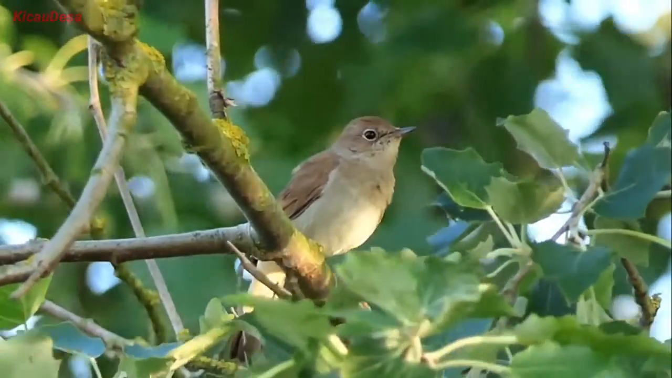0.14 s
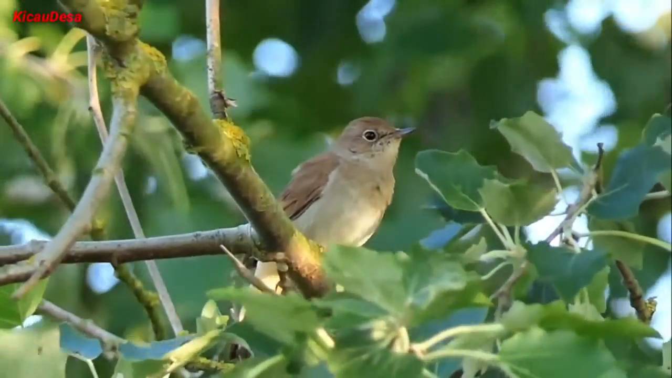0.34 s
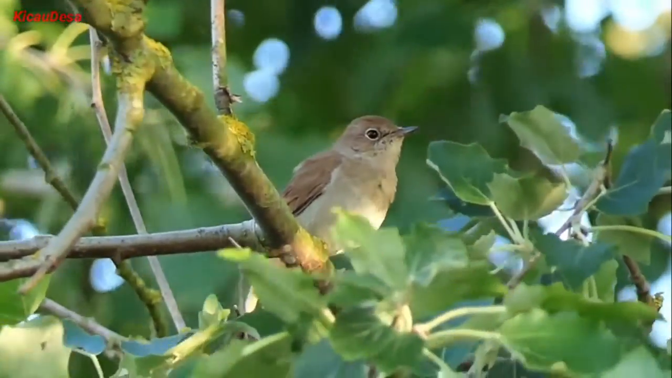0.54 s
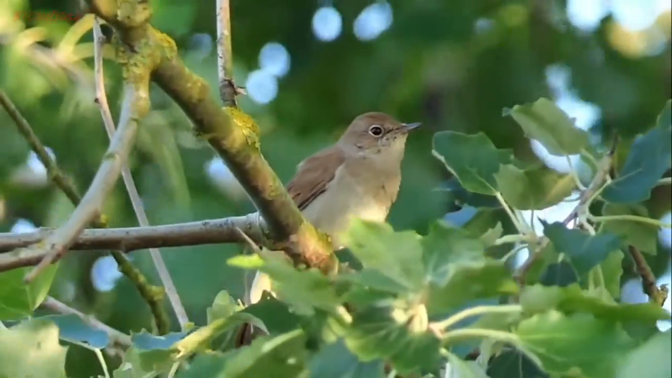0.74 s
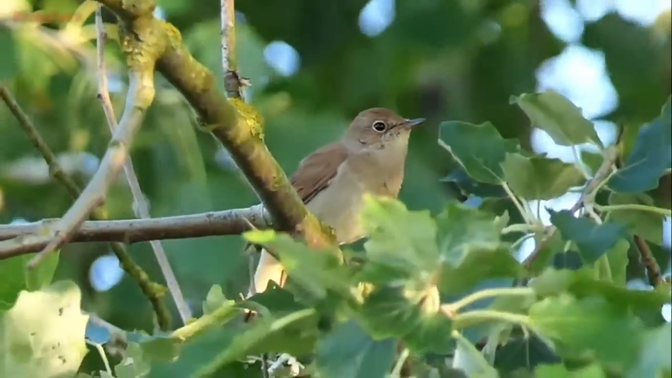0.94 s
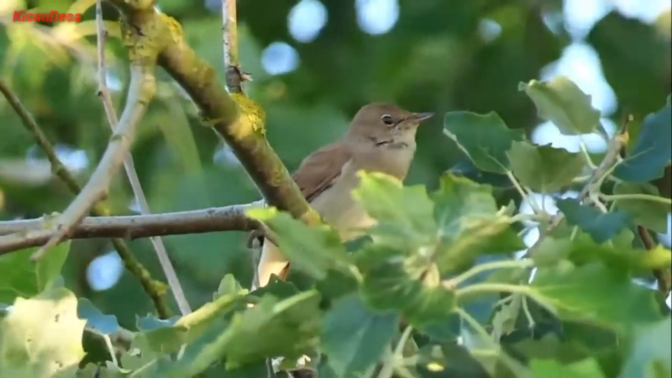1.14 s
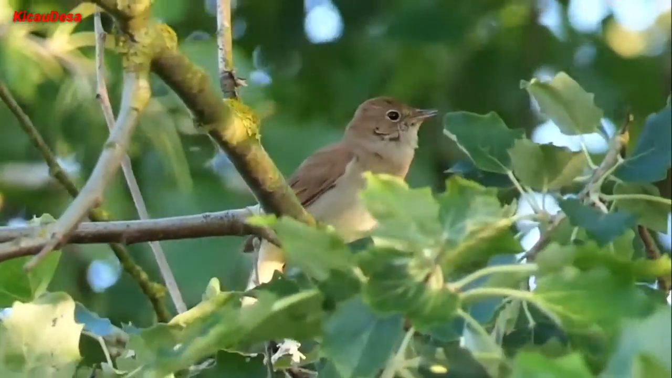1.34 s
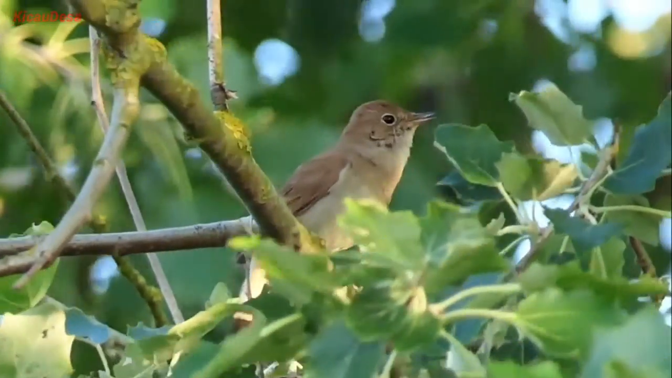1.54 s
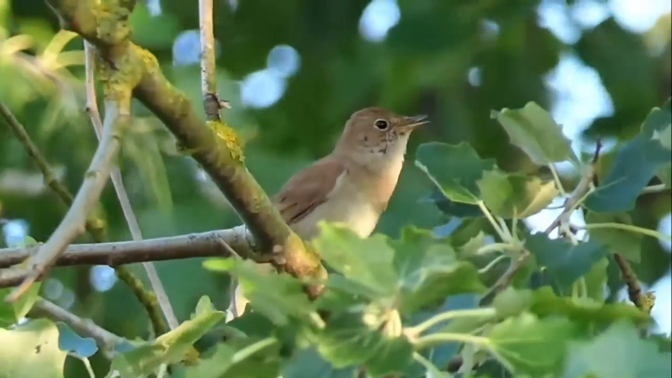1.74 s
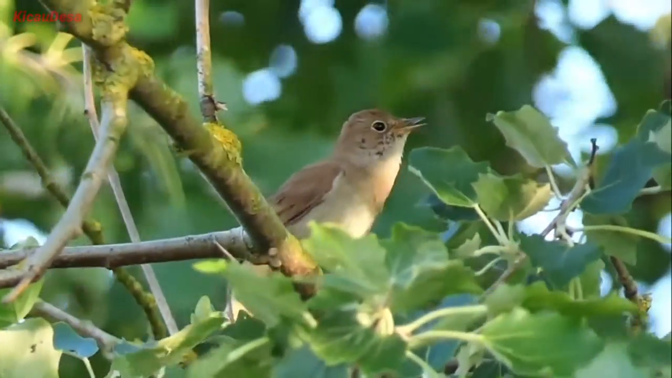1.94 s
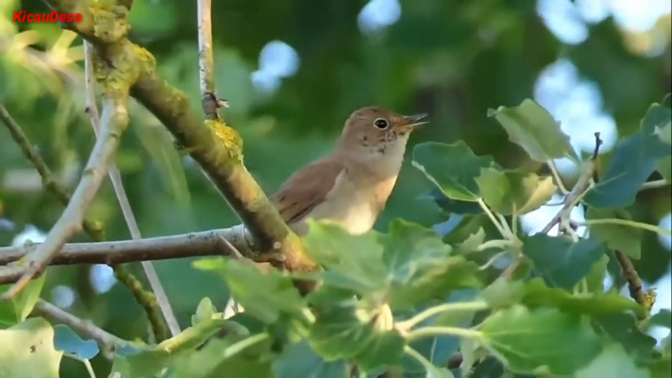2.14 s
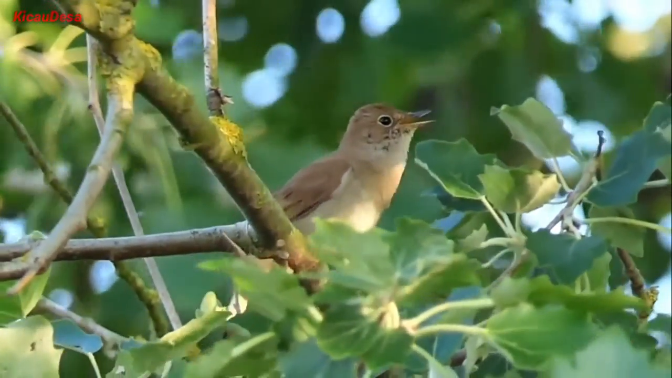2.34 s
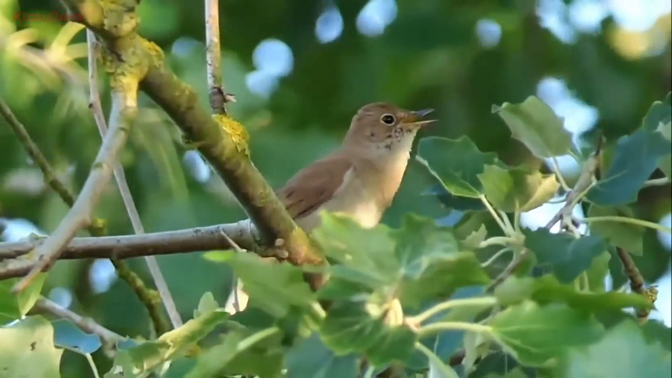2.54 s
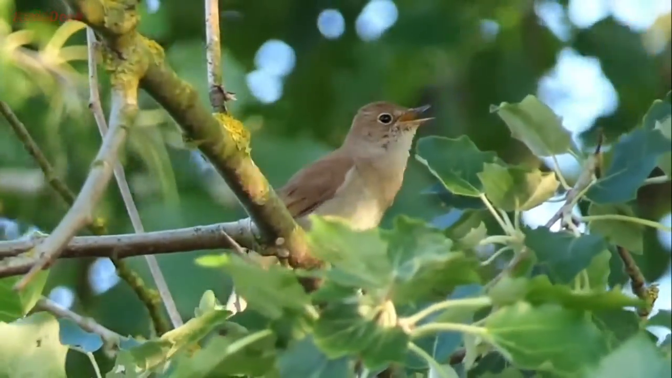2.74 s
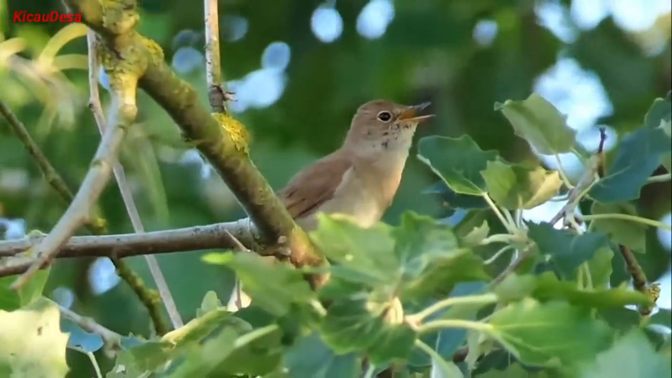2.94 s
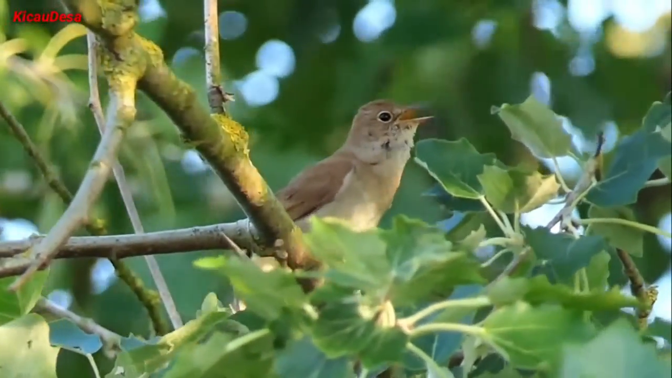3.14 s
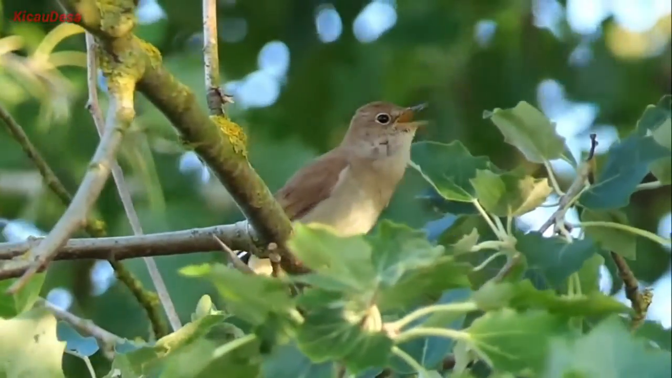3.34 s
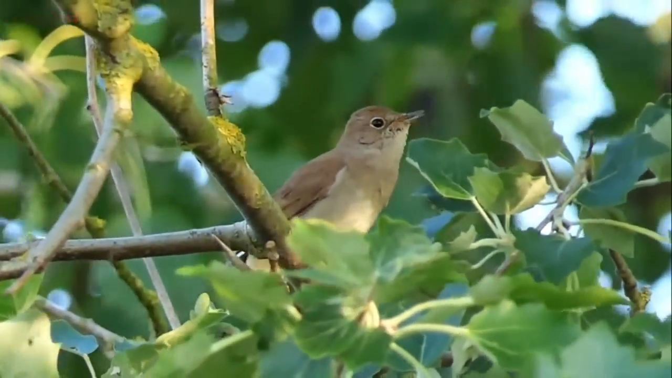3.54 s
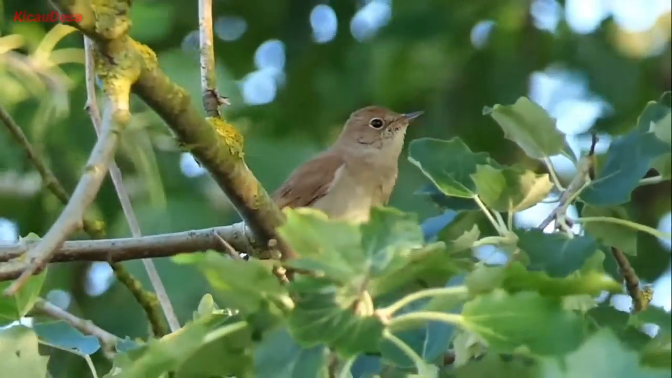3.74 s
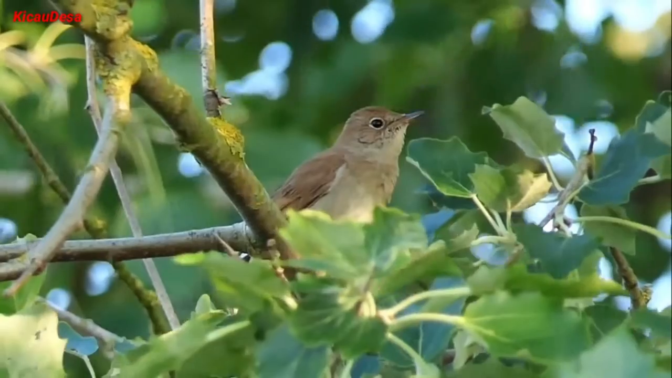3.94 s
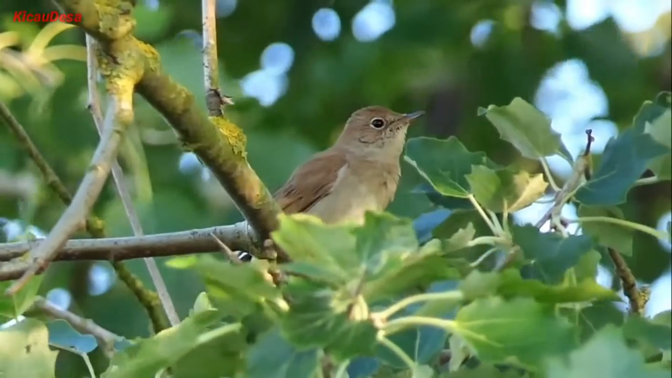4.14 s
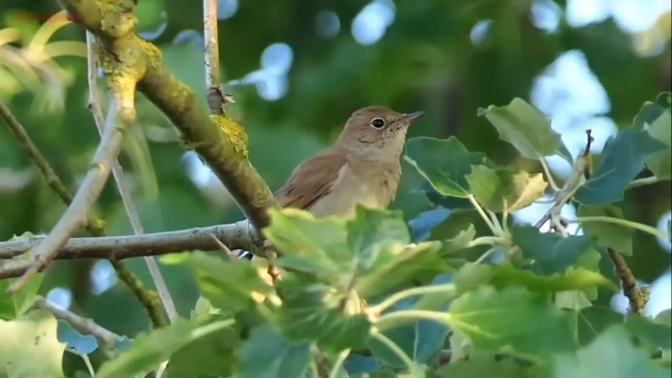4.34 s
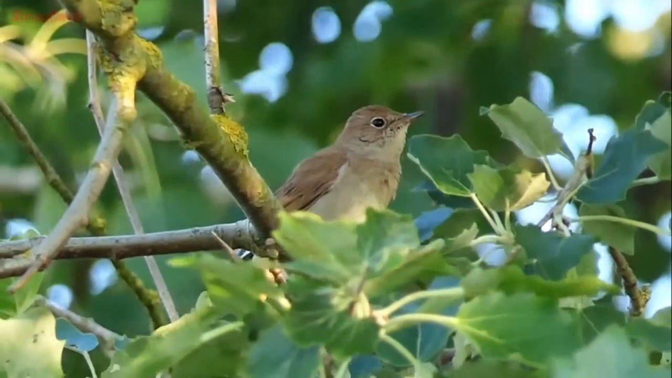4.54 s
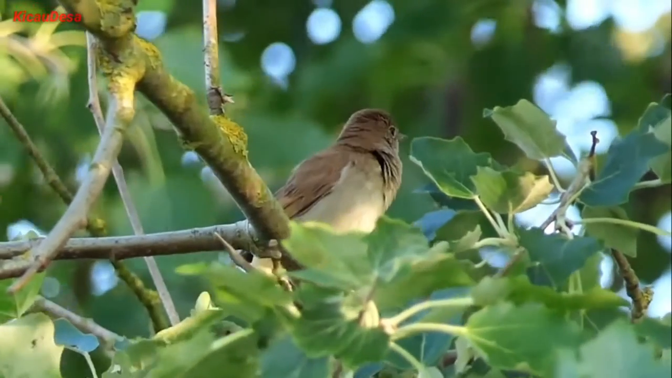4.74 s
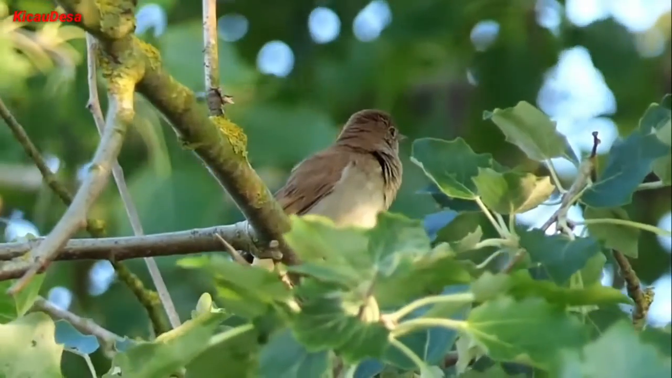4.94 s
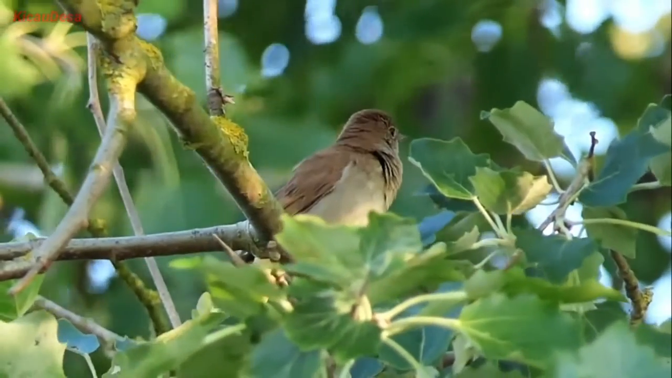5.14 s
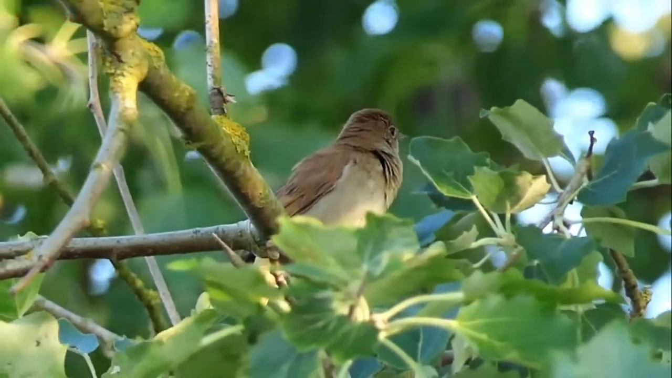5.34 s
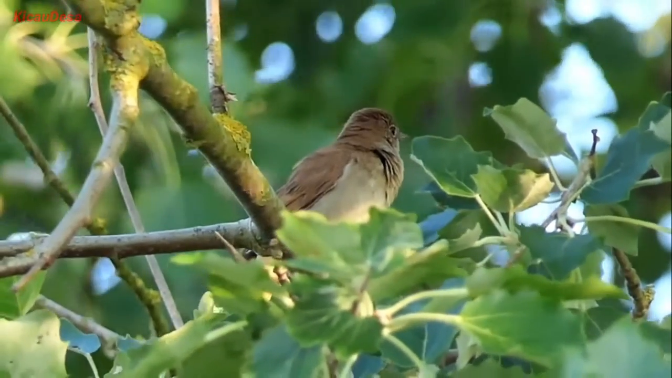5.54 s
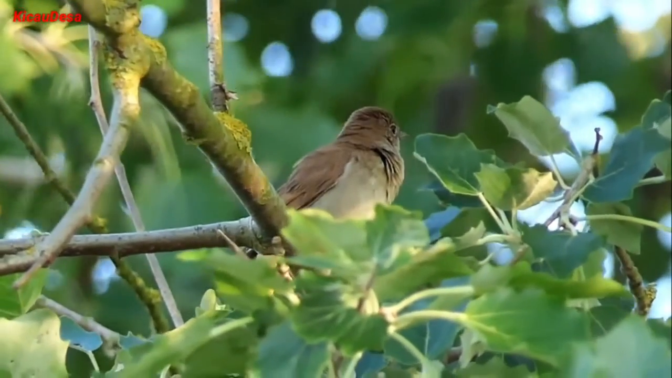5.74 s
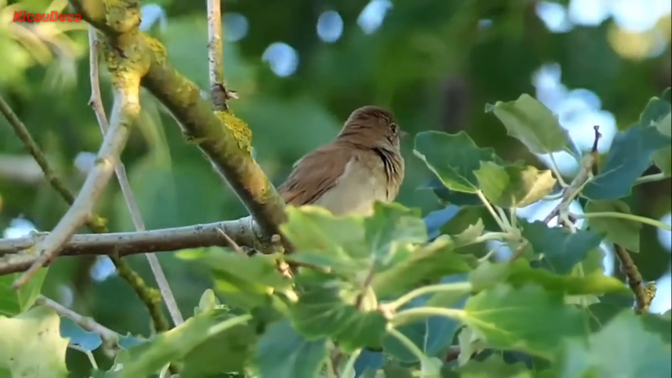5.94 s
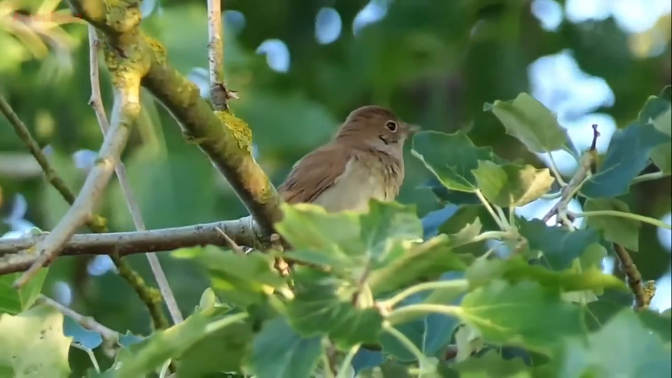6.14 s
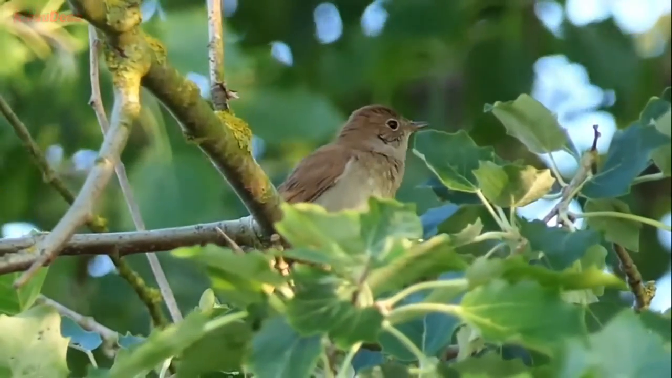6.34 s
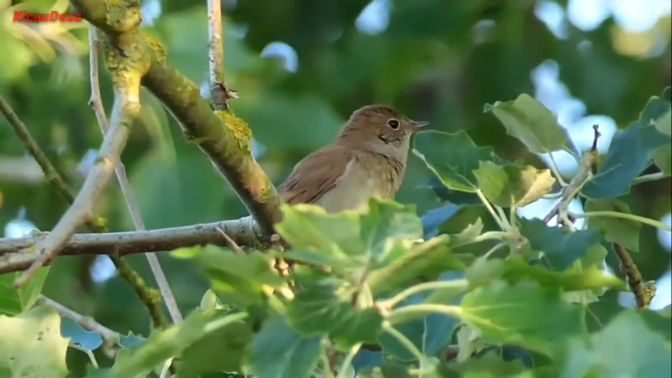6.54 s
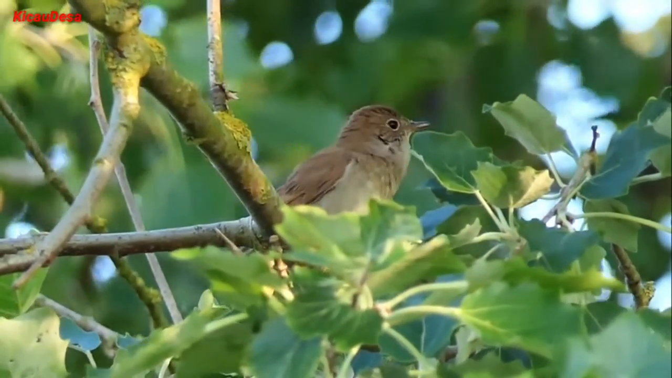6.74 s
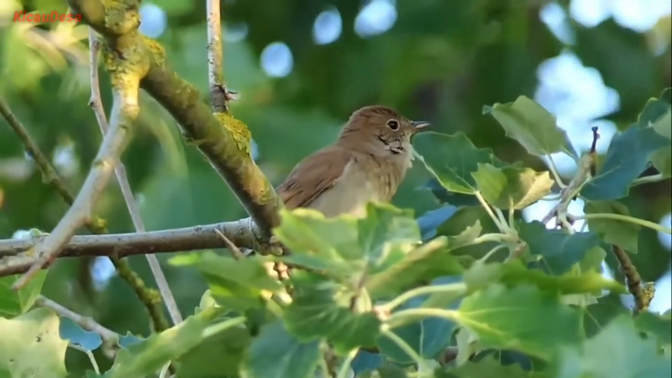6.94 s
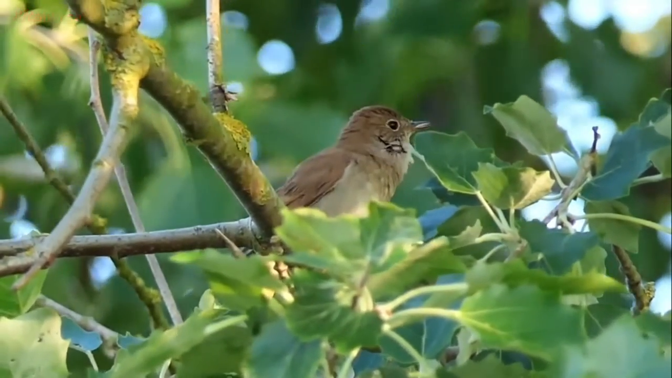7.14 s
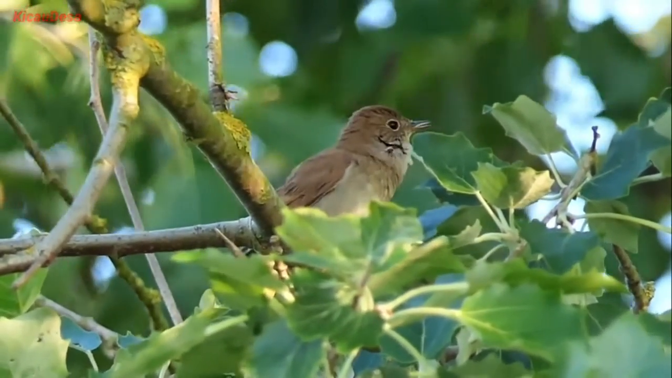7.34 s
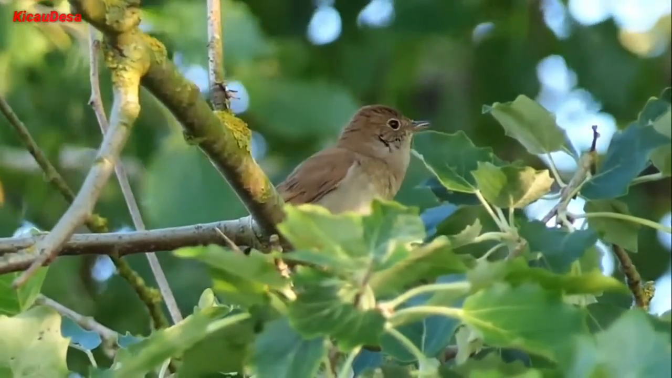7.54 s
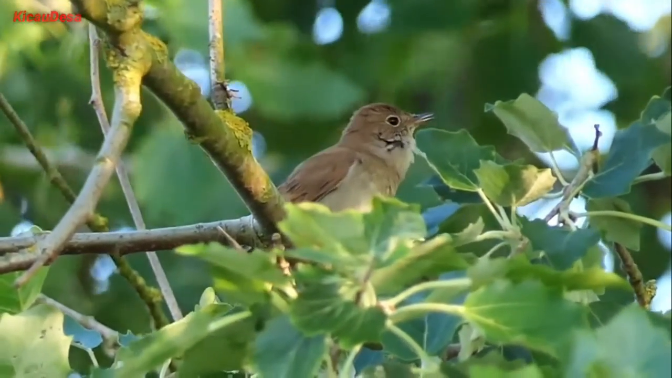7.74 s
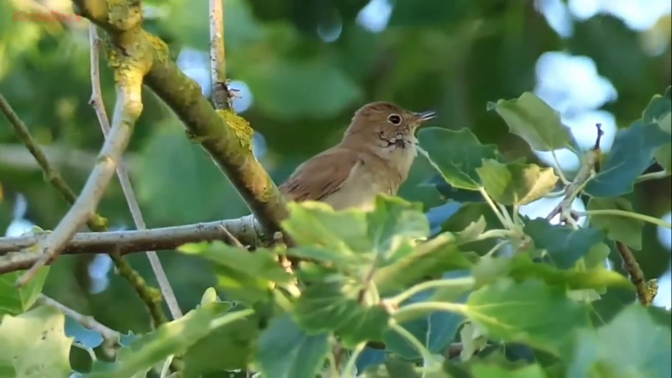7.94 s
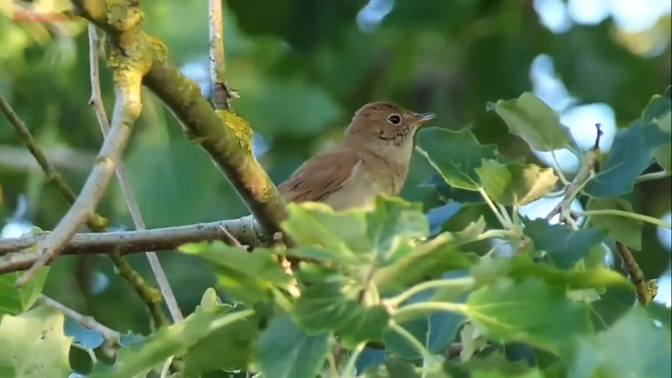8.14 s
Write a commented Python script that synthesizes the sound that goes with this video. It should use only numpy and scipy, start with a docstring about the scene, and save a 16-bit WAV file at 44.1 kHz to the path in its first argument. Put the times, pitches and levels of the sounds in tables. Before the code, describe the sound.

Quiet outdoor air, a faint hush with low rumble, runs throughout. From 0 to 0.65 s a nightingale gives four thin, high, slightly sagging whistles, while a distant bird chips faintly and another ticks dryly now and then. Two tiny clucks come near 1.05 s. From 1.27 to 3.35 s eleven round fluted notes repeat about five per second, swelling from soft to very loud, with buzzy edges on the last three. At 3.42 to 3.7 s a sharp flourish bursts out: bright swoop, short scoop, rasping upward zip, with a brief scatter of leafy echo. The singer then pauses; from 3.7 s farther birds give thin whistle runs, and from about 4.6 s warbles, chirps and faint twitter. Soft wet clucks fall at 6.4, 6.6, 6.9 and 7.7 s. Two low, quavering whistles, gently rising, sound at 7.1-7.6 and 7.85-8.3 s, the second louder, ending the scene.

```python
"""Nightingale in a poplar

A nightingale sings four thin whistles, a crescendo of eleven fluted notes and a loud three-part flourish,
clucks softly and starts two low, drawn-out whistles: syrinx tones on pitch curves, with noise where they rasp.
Other small birds warble, chirp and tick farther off, as bent tones and short bursts of noise.
Decaying noise echoes scatter every note in the foliage, over a faint outdoor hush and a low rumble of air."""
import sys
import numpy as np
from scipy import signal
from scipy.fft import rfft, irfft, next_fast_len
from scipy.io import wavfile
from scipy.ndimage import map_coordinates

SR = 44100
rng = np.random.default_rng(int(sys.argv[2]) if len(sys.argv) > 2 else 0)


def store_wav(level_fs):
    """Save 16-bit WAV to argv[1]."""
    pcm = np.round(np.clip(np.atleast_2d(level_fs), -1, 1) * 32767)
    wavfile.write(sys.argv[1], SR, pcm.T.astype(np.int16))


N = 365148
TOP_HZ = 15500  # upper band limit

# falling syllable, drops fast then eases: (share of length [0-1], share of pitch [0-1])
FALL_CONTOUR = [(0, 0.96), (.5, .81), (1, .69)]


def amp(db):
    """Decibels to gain."""
    return 10 ** (np.asarray(db) / 20)


def unit(x):
    """Scale to rms 1."""
    return x / np.sqrt(np.mean(x ** 2) + 1e-20)


def along(points, hz):
    """Read (Hz, value) points on a log frequency axis."""
    f, v = np.transpose(points)
    return np.interp(np.log(hz + 1), np.log(f + 1), v)


def filtered(x, response):
    """x with its spectrum multiplied by response(Hz)."""
    n = x.shape[-1]
    m = next_fast_len(n + 8192)
    gain = response(np.fft.rfftfreq(m, 1 / SR))
    return irfft(rfft(x, m) * gain, m)[..., :n]


def noise(spectrum, n):
    """n samples of coloured noise of rms 1."""
    white = rng.standard_normal(n)
    return unit(filtered(white, lambda hz: amp(along(spectrum, hz))))


def wobble(rate, n):
    """A smooth random curve, rate knots a second."""
    knots = rng.standard_normal(int(n * rate / SR) + 4)
    return map_coordinates(knots, [np.arange(n) * rate / SR])


def clock(length):
    """Sample times [s] of a note."""
    return np.arange(int(length * SR)) / SR


def ramp(x):
    """A smooth step from 0 to 1."""
    return np.sin(np.clip(x, 0, 1) * np.pi / 2) ** 2


def add(track, s, note):
    """Mix a note into a track at time s [s], cut to the track."""
    i = round(s * SR)
    note = note[max(-i, 0):max(N - i, 0)]
    track[max(i, 0):max(i, 0) + len(note)] += note


def stereo(mid, side, width):
    """Two close microphones hear almost the same: a shared mid and a weak side of opposite sign."""
    side = filtered(side, lambda hz: amp(along(width, hz)))
    return np.array([mid + side, mid - side])


def among_leaves(x, near_db, far_db, bright_db):
    """Near leaves scatter a quick cluster of echoes, the trees a longer tail; bright_db shapes their treble."""
    # tail decay: (frequency [Hz], t60 [s])
    tail_t60 = [(500, 0.23), (2000, 0.42), (6000, 0.37), (9000, 0.43), (15000, 0.24)]
    # reflection of the leaves: (frequency [Hz], share of bright_db [ratio])
    leaf_share = [(2000, 0.051), (4000, 1.27), (7000, 1.4), (10500, 0.063), (12700, 0.63), (15000, .9)]
    # width of the echoes: (frequency [Hz], side gain [dB])
    echo_width = [(2000, -58.5), (5000, -19.5), (8000, -22.5), (13000, -9.5)]
    hz, t, z = signal.stft(rng.standard_normal((2, SR // 2)), SR, nperseg=256)
    decay = amp(-60 * t / along(tail_t60, hz)[:, None])
    far = signal.istft(z * decay, SR, nperseg=256)[1]
    t = np.arange(far.shape[1]) / SR
    near = rng.standard_normal(far.shape) * amp(-60 * t / 0.14)
    near = near * ramp(t / 0.0037)
    far = far * ramp(t / 0.01)
    echo = sum(amp(db) * e / np.linalg.norm(e[0]) for db, e in [(near_db, near), (far_db, far)])
    wet = signal.fftconvolve(x[None], echo, axes=1)[:, :N]
    mid, side = filtered(wet, lambda f: amp(bright_db * along(leaf_share, f)))
    return x + stereo(mid, side, echo_width)


def syrinx(hz, overtones=()):
    """A nearly pure tone on a pitch curve, fundamental of rms 1, with weak overtones (number, dB)."""
    phase = 2 * np.pi * np.cumsum(hz) / SR
    upper = sum(amp(db) * np.sin(k * phase) * (k * hz < SR / 2) for k, db in overtones)
    return np.sqrt(2) * (np.sin(phase) + upper)


def loud_syrinx(hz, blur, edge=1):
    """A strong pure tone; overtones follow the throat's resonances and smear where the flow is turbulent."""
    # throat resonances: (frequency [Hz], overtone strength at edge 1 [dB re fundamental])
    throat = [(3000, -29), (4200, -38), (5500, -48), (7500, -49.5), (9500, -37), (11000, -50),
              (12600, -30.5), (13600, -48), (14500, -36.5), (15500, -46.5)]
    phase, n = 2 * np.pi * np.cumsum(hz) / SR, len(hz)
    overtones = 0
    for k in range(2, 10):
        strength = amp(along(throat, k * hz)) * (k * hz < TOP_HZ)
        smear = blur * np.sqrt(k) * wobble(1000, n)
        overtones = overtones + strength * np.sin(k * phase + smear)
    return np.sqrt(2) * (np.sin(phase) + edge * overtones)


def air(hush_db=-57, rumble_db=-53.5):
    """A near-steady hush of distant leaves and traffic over a slowly heaving rumble."""
    # hush spectrum: (frequency [Hz], relative level [dB])
    hush_colour = [(59, -28.5), (100, -5.5), (209, -2.5), (293, -11), (377, -11), (551, -0.5), (823, 0.5),
                   (2220, -7), (3830, -6.5), (5040, -10.5), (5970, -17), (6770, -13), (9890, -22.5),
                   (14500, -26.5), (15400, -25)]
    # rumble spectrum: (frequency [Hz], relative level [dB])
    rumble_colour = [(4, -2.5), (12, 6.5), (25, -7.5), (38, -4), (50, -1.5), (62, -9.5), (80, -24.5),
                     (120, -29.5), (300, -69)]
    # width of the air: (frequency [Hz], side gain [dB])
    air_width = [(25, -25), (90, -14.5), (300, -13.5), (700, -22), (2000, -19.5), (8000, -6.5)]
    hush = stereo(noise(hush_colour, N), noise(hush_colour, N), air_width)
    rumble = stereo(noise(rumble_colour, N), noise(rumble_colour, N), air_width)
    hush = amp(hush_db + 0.69 * wobble(20.0, N)) * hush
    rumble = amp(rumble_db + 0.83 * wobble(1.8, N)) * rumble
    return hush + rumble


def slur(length, start_hz, middle_hz, end_hz, jitter):
    """A note that bends along an arc through three pitches, loudest in its middle."""
    u = clock(length) / length
    arc_hz = 2 * u * (1 - u) * (2 * middle_hz - start_hz - end_hz)
    hz = start_hz + (end_hz - start_hz) * u + arc_hz
    return np.sin(np.pi * u) ** 0.59 * syrinx(hz * (1 + jitter * wobble(400, len(u))))


def twitter(count=150, low_hz=3200, high_hz=8000, bend=0.1235, trim_db=-3):
    """Many faint chirps from deep in the trees, at random times and pitches in the later part."""
    # loudness of the twitter: (time [s], level before trim and scatter [dB])
    loudness = [(4.852, -56), (5.7, -65), (6.5, -63.5), (7.3, -61.5), (7.8, -63.5), (8.28, -59)]
    out = np.zeros(N)
    times, levels = np.transpose(loudness)
    for when, pitch, span, a, b, size in rng.random((count, 6)):
        s = times[0] + (times[-1] - times[0]) * when ** .7  # denser toward the end
        hz = low_hz + (high_hz - low_hz) * pitch
        db = np.interp(s, times, levels) + trim_db + 7 * (size - .5)
        start_hz = hz * (1 + bend * (2 * a - 1))
        end_hz = hz * (1 + bend * (2 * b - 1.4))
        add(out, s, amp(db) * slur(0.0103 + 0.02 * span, start_hz, hz, end_hz, jitter=0.01))
    return out


def ticks(trim_db=-1, t60_s=0.068):
    """A bird's dry tick: a burst of noise that dies at once."""
    # ticking calls: (time [s], level before trim and envelope [dB])
    calls = [(.377, -35), (.825, -38.5), (1.436, -37.5), (1.927, -36), (2.378, -36.5), (2.946, -35.5),
             (3.398, -31.5), (4.076, -35), (5.772, -33.5), (6.134, -37), (6.702, -37.5), (7.305, -40.5),
             (7.941, -38.5)]
    # tick spectrum: (frequency [Hz], relative level [dB])
    colour = [(1000, -23.5), (1800, -8.5), (3500, -3), (5500, 0), (7000, -0.5), (8300, -3), (9500, -27.5),
              (15000, -35.5)]
    out, t = np.zeros(N), clock(.06)
    for s, db in calls:
        level = amp(db + trim_db - 60 * t / t60_s) * ramp(t / 0.0048)
        add(out, s - .002, level * noise(colour, len(t)))
    return out


def syllables(shape, rows, jitter=0.0055, octave_db=-31, flutter_db=1.5):
    """One syllable type, stretched and transposed for each row and loudest in its middle."""
    out = np.zeros(N)
    for s, length, pitch_hz, db in rows:
        u = clock(length) / length
        hz = pitch_hz * np.interp(u, *np.transpose(shape)) * (1 + jitter * wobble(393, len(u)))
        level = amp(db + flutter_db * wobble(140, len(u))) * np.sin(np.pi * u) ** 0.46
        add(out, s, level * syrinx(hz, [(2, octave_db)]))
    return out


def chips(count=11, scatter_s=0.026, scatter_pitch=0.043, scatter_db=1.0):
    """A far bird repeats a faint, ragged falling chip at an uneven pace."""
    from_s, to_s = .08, 1.3
    length_s, pitch_hz, level_db = 0.016, 3200, -54.5  # mean pitch and level
    beats = np.linspace(from_s, to_s, count)
    rows = [(s + scatter_s * a, length_s, pitch_hz * (1 + scatter_pitch * b), level_db + scatter_db * c)
            for s, (a, b, c) in zip(beats, rng.standard_normal((count, 3)))]
    return syllables(FALL_CONTOUR, rows, jitter=0.043)


def warblers():
    """The neighbours string their song together from eight syllable types, each a pitch contour."""
    # contours: (share of length [0-1], share of pitch [ratio])
    # rows: (start [s], length [s], pitch [Hz], level [dB])
    # hooks hold their pitch, then plunge
    hook_contour = [(0, 0.97), (.6, .94), (.8, .85), (1, .63)]
    hooks = [(4.573, 0.055, 6600, -60), (4.754, 0.08, 6470, -54), (4.897, 0.084, 6610, -48),
             (5.361, 0.024, 5190, -42.5), (5.689, 0.027, 5120, -43.5), (6.577, .068, 6680, -49.5)]
    # dips sink to their pitch and climb out again
    dip_contour = [(0, 1.26), (.2, 1.1), (.44, 1), (.66, 1.22), (1, 1.43)]
    dips = [(5.039, .098, 3755, -40.5), (5.203, 0.095, 3610, -41)]
    # flicks dart up to their pitch and back
    flick_contour = [(0, .62), (.4, 1), (.6, 1), (1, 0.78)]
    flicks = [(5.611, 0.018, 4680, -42), (5.964, .018, 4370, -43), (6.149, 0.027, 3980, -47),
              (6.461, .03, 8100, -59), (7.195, 0.039, 8070, -60), (7.986, 0.026, 7990, -52.5)]
    # rises climb and level off
    rise_contour = [(0, .76), (.2, .88), (1, 1)]
    rises = [(5.401, 0.085, 3690, -46.5), (5.734, 0.084, 3574, -43.5), (6.243, 0.067, 2840, -50.5)]
    # upsweeps climb steadily through a wide span
    upsweep_contour = [(0, 0.6), (.5, .8), (1, 1)]
    upsweeps = [(5.478, 0.059, 3286, -53.5), (5.608, 0.061, 3280, -51), (5.741, 0.063, 3230, -52),
                (7.135, .039, 6500, -58.5), (7.618, .026, 6900, -53)]
    # falls, on the shared contour
    falls = [(.47, 0.028, 5320, -54), (0.547, 0.024, 5800, -52), (.799, 0.022, 3170, -54.5),
             (0.919, .022, 3200, -59), (1.121, 0.011, 6660, -48.5), (1.201, 0.017, 6200, -51.5),
             (5.55, 0.067, 3500, -48), (5.871, 0.044, 5400, -56), (5.883, 0.058, 3460, -45.5),
             (6.028, 0.035, 2300, -58.5), (6.063, 0.057, 3452, -48), (6.086, 0.018, 2790, -52),
             (6.393, .066, 6530, -48), (6.715, 0.025, 6200, -53), (7.41, 0.019, 4220, -51.5),
             (7.825, .024, 4500, -58), (7.86, 0.065, 3700, -54.5)]
    # slides sag gently from a high pitch
    slide_contour = [(0, 0.97), (.5, .965), (1, .92)]
    slides = [(2.152, 0.15, 7500, -55), (3.165, .12, 7500, -58), (6.092, .11, 9300, -63.5),
              (7.185, .056, 6800, -56.5)]
    # pipes stay nearly level
    pipe_contour = [(0, 1), (.5, .993), (1, .975)]
    pipes = [(.3, 0.33, 3700, -69.5), (5.226, 0.19, 2730, -61), (7.658, 0.141, 5940, -60),
             (7.865, 0.18, 4810, -57)]
    kinds = [(hook_contour, hooks), (dip_contour, dips), (flick_contour, flicks), (rise_contour, rises),
             (upsweep_contour, upsweeps), (FALL_CONTOUR, falls), (slide_contour, slides), (pipe_contour, pipes)]
    return sum(syllables(shape, rows) for shape, rows in kinds)


def thin_note(length, top_hz, sag_hz_per_s, hook=0.053, jitter=0.0065):
    """A high whistle that hooks up toward its top pitch and sags slowly."""
    t = clock(length)
    sagging_hz = top_hz - sag_hz_per_s * np.maximum(t - .025, 0)
    hz = sagging_hz * (1 - hook * np.exp(-t / .008) + jitter * wobble(200, len(t)))
    swell = ramp(t / .0018) * np.interp(t, [0, .04], [.35, 1]) * ramp((length - t) / 0.041)
    return amp(2.07 * wobble(65.3, len(t))) * swell * syrinx(hz, [(2, -42)])


def thin_runs(count=3):
    """A neighbour answers with runs of the thin whistle at an even pace."""
    # runs: (start [s], period [s], top pitch [Hz], first level [dB], change per note [dB])
    runs = [(1.61, .19, 7105, -53.5, -2.5), (3.704, 0.17, 6940, -52, -1.5), (4.599, 0.22, 6980, -62.5, -2),
            (5.216, .208, 7165, -55, -1), (7.82, .2, 7225, -55.5, 1)]
    duty, sag_hz_per_s = 0.93, 2100  # duty: share of the period that sounds
    out = np.zeros(N)
    for s, period, top_hz, db, change_db in runs:
        for k in range(count):
            note = thin_note(duty * period, top_hz, sag_hz_per_s, hook=0.025)
            add(out, s + k * period, amp(db + k * change_db) * note)
    return out


def stroke(length, start_hz, end_hz, jitter=0.066, burst_db=-4):
    """A ragged sweep with a noise burst, so short it sounds like a wet click; narrow sweeps stay purer."""
    # burst spectrum: (frequency [Hz], relative level [dB])
    colour = [(900, -26), (1600, 6.5), (2500, -4.5), (3700, 7), (4500, -1), (5500, -34), (12000, -35)]
    u = clock(length) / length
    hz = start_hz * (end_hz / start_hz) ** u * (1 + jitter * wobble(1410, len(u)))
    octaves = abs(np.log2(end_hz / start_hz))
    burst = amp(burst_db) * octaves * noise(colour, len(u))
    return np.sin(np.pi * u) * (syrinx(hz) + burst)


def clucks(trim_db=-2.5):
    """Each cluck is a sharp downward stroke, a weaker rebound and a short low after-note."""
    # clucks: (time [s], start pitch [Hz], level before trim [dB],
    #          rebound [dB re first stroke], after-note [dB re first stroke])
    rows = [(1.052, 4230, -42, -8, -15), (1.073, 3100, -43, -4, -15), (6.373, 5120, -38.5, -7, -7),
            (6.608, 5120, -37.5, -2, -4.5), (6.869, 4670, -36, -2.5, -5.5), (7.718, 4210, -34, -14, -21)]
    stroke_s, end_hz, rebound_s = 0.00547, 1894, .0085
    after_gap_s, after_s, after_start_hz, after_end_hz = .043, 0.012, 1894, 1540
    out = np.zeros(N)
    for s, start_hz, db, rebound_db, after_db in rows:
        add(out, s, amp(db) * stroke(stroke_s, start_hz, end_hz))
        add(out, s + rebound_s, amp(db + rebound_db) * stroke(stroke_s, start_hz, end_hz))
        add(out, s + after_gap_s, amp(db + after_db) * stroke(after_s, after_start_hz, after_end_hz))
    return amp(trim_db) * out


def low_whistles(quaver=.005):
    """Two soft, slightly quavering syrinx whistles open the next phrase."""
    # one curve a whistle: (time [s], pitch [Hz], level [dB])
    curves = [
        [(7.12, 1238, -69), (7.138, 1222, -54), (7.226, 1216, -54), (7.542, 1303, -49), (7.596, 1290, -52.5),
         (7.635, 1410, -49.5)],
        [(7.85, 1286, -52), (7.862, 1300, -50.5), (7.91, 1310, -49.5), (7.936, 1339, -45), (8.24, 1383, -43),
         (8.28, 1430, -41.5)],
    ]
    out = np.zeros(N)
    for rows in curves:
        s, hz, db = np.transpose(rows)
        t = s[0] + clock(s[-1] - s[0])
        pitch_hz = np.interp(t, s, hz) * (1 + quaver * wobble(96.0, len(t)))
        gate = ramp((t - s[0]) / 0.0075) * ramp((s[-1] - t) / 0.0039)
        tone = syrinx(pitch_hz, [(2, -14.0), (3, -38)])
        add(out, s[0], gate * amp(np.interp(t, s, db)) * tone)
    return out


def thin_whistles():
    """The singer opens with four thin, sagging whistles."""
    # whistles: (start [s], top pitch [Hz], level [dB])
    whistles = [(-.025, 7114, -36.5), (.152, 7110, -35.5), (0.34, 7070, -34.5), (0.518, 7010, -36)]
    out = np.zeros(N)
    for s, top_hz, db in whistles:
        add(out, s, amp(db) * thin_note(0.14, top_hz, sag_hz_per_s=3300))
    return out


def fluted_notes(buzz_hz=350, buzz_depth=0.015, buzz_bend=0.026, jitter=0.0037, droop=0.28,
                 blur=0.44, buzz_blur=1.0, full_db=-19):
    """Notes slide in, swell and, if firm, drop as they close; the hardest break into a buzz near the end."""
    # notes: (start [s], length [s], body pitch [Hz], level before shaping [dB], buzz [0-1])
    notes = [(1.27, 0.092, 2022, -33.5, .06), (1.45, 0.094, 2058, -30, .1), (1.638, 0.096, 2030, -25.5, 0),
             (1.809, .12, 2040, -23, .2), (1.994, .12, 2085, -21.5, .25), (2.193, .12, 2072, -20, .55),
             (2.387, 0.13, 2037, -20, 0.03), (2.586, 0.13, 2004, -18.5, 0.07),
             (2.792, 0.12, 1967, -17.5, 1), (2.997, .13, 1997, -17, .9), (3.219, 0.12, 1987, -16.5, .9)]
    # note shape: (share of length [0-1], share of the rise to the top pitch [0-1], loudness gain [0-1])
    contour = [(0, .1, 0), (.12, .15, .1), (.25, .35, 0.27), (.5, .62, 0.86), (.7, .9, .9), (.85, 1, 0.85),
               (1, .46, 0.97)]
    top_hz = 2120  # firm notes climb toward this pitch
    buzz_cost_db, buzz_shake_db = 1.2, 1  # level lost and shaken at full buzz
    gentle_db, firm_db = -33, -29.5  # climb and closing drop set in between these levels
    entry_high_hz, entry_low_hz, entry_turn_s = 2300, 1880, 2.3  # early notes enter from above, later from below
    out = np.zeros(N)
    share, *columns = np.transpose(contour)
    for s, length, body_hz, db, buzz in notes:
        t = clock(length)
        u, n = t / length, len(t)
        rise, loudness = [np.interp(u, share, c) for c in columns]
        force = ramp((db - gentle_db) / (firm_db - gentle_db))
        entry_hz = entry_high_hz if s < entry_turn_s else entry_low_hz
        rough = buzz * ramp((u - .64) / 0.12)
        flutter = np.sin(2 * np.pi * np.cumsum(buzz_hz * (1 + 0.092 * wobble(180, n))) / SR)
        slide_hz = (entry_hz - body_hz) * np.exp(-(t / 0.011) ** 2)
        hz = body_hz + force * (top_hz - body_hz) * rise + slide_hz
        hz = hz * (1 - droop * force * np.exp((t - length) / 0.0042))
        shake = rough * (buzz_bend * flutter + 0.0053 * wobble(1500, n))
        hz = hz * (1 + jitter * wobble(500, n) + shake)
        close_s = np.interp(force, [0, 1], [.035, .018])  # gentle notes fade, forceful ones snap shut
        gate = ramp(t / 0.0045) * ramp((length - t) / close_s)
        level = amp(db + rough * (buzz_shake_db * wobble(130, n) - buzz_cost_db)) * loudness * gate
        edge = (level / amp(full_db)) ** 0.5  # overtones grow with the air pressure
        tone = loud_syrinx(hz, blur * u + buzz_blur * rough, edge)
        add(out, s, level * (1 + buzz_depth * rough * flutter) * tone)
    return out


def gesture(rows, octave_db, hiss_db, jitter, blur=0.52, edge=1):
    """One fast sweep of the syrinx; rasp shakes its pitch and level and adds hiss."""
    # hiss spectrum: (frequency [Hz], relative level [dB])
    hiss_colour = [(1500, -27), (3000, -16.5), (5000, -5.5), (7400, 7.5), (9000, 2.5), (10600, -16),
                   (12700, 3.5), (15500, -16.5)]
    s, *columns = np.transpose(rows)
    t = s[0] + clock(s[-1] - s[0])
    hz, db, rasp = [np.interp(t, s, c) for c in columns]
    hz = hz * (1 + jitter * rasp * wobble(1500, len(t)))
    tone = loud_syrinx(hz, blur + rasp, edge) + amp(octave_db) * syrinx(2 * hz)
    hiss = amp(hiss_db) * rasp * noise(hiss_colour, len(t))
    voice = tone * amp(2.0 * rasp * wobble(700, len(t))) + hiss
    out = np.zeros(N)
    add(out, s[0], amp(db) * voice)
    return out


def flourish():
    """A swoop with a bright spark at its start, a scoop and a rising zip in two voices, all fast sweeps."""
    # all five curves: (time [s], pitch [Hz], level of the tone [dB], rasp [0-1])
    swoop_curve = [(3.418, 2710, -45.5, 0.82), (3.424, 3470, -29, .9), (3.427, 4800, -16.5, .7),
                   (3.431, 5270, -20, 0.4), (3.44, 3560, -15, .6), (3.446, 3130, -17.5, 0.07),
                   (3.458, 2907, -20.5, 0.2), (3.468, 3042, -15, 0), (3.478, 3214, -12.5, 0.07),
                   (3.49, 3426, -14.5, 0.05), (3.503, 3540, -24.5, 0.3), (3.514, 3430, -44, .27)]
    # a bright, rasping overtone flashes upward as the swoop begins, same columns
    spark_curve = [(3.418, 4640, -30, 0.7), (3.423, 5490, -27, 0.27), (3.426, 7800, -35, 0.33),
                   (3.43, 9400, -30, 0.53)]
    # drop and rebound in pitch, same columns
    scoop_curve = [(3.567, 2390, -31, .5), (3.573, 1716, -22.5, .1), (3.584, 1550, -27, .1),
                   (3.593, 2186, -19, .1), (3.603, 2640, -15.5, .05), (3.609, 2590, -25, .1),
                   (3.617, 2450, -37.5, .2)]
    # lower and upper voice of the zip, same columns
    zip_low_curve = [(3.649, 2570, -56, 0.93), (3.658, 3187, -34.5, 0.93), (3.666, 3730, -29, 0.94),
                     (3.675, 4780, -30.5, 0.43), (3.683, 6140, -29.5, 0.38), (3.697, 7200, -44.5, 0.66)]
    zip_high_curve = [(3.652, 3770, -42.5, 1), (3.658, 4360, -29, 0.98), (3.669, 6300, -27.5, 1),
                      (3.677, 7270, -21, 0.53), (3.683, 7820, -22.5, 0.28), (3.696, 8030, -39, 1)]
    swoop = gesture(swoop_curve, octave_db=-42.5, hiss_db=-15.5, jitter=0.013, edge=.6)
    spark = gesture(spark_curve, octave_db=-18.0, hiss_db=1, jitter=0.033)
    scoop = gesture(scoop_curve, octave_db=-37, hiss_db=-16.0, jitter=.04, edge=0.83)
    zip_low = gesture(zip_low_curve, octave_db=-7.0, hiss_db=-2.5, jitter=0.042)
    zip_high = gesture(zip_high_curve, octave_db=-25.0, hiss_db=1.5, jitter=0.028)
    return swoop + spark + scoop + zip_low + zip_high


def scene():
    """The near singer is drier; the farther birds lie deep in the foliage."""
    distant = among_leaves(twitter(), near_db=-6.5, far_db=-8, bright_db=4)
    neighbour_calls = warblers() + thin_runs() + chips() + ticks()
    neighbours = among_leaves(neighbour_calls, near_db=-9.0, far_db=-13, bright_db=2)
    whistles = among_leaves(thin_whistles() + low_whistles(), near_db=-19.0, far_db=-15.5, bright_db=-0.5)
    crescendo = among_leaves(fluted_notes(), near_db=-13.5, far_db=-21.5, bright_db=12.5)
    sharp_notes = among_leaves(flourish() + clucks(), near_db=-9.5, far_db=-19.5, bright_db=3.5)
    return air() + distant + neighbours + whistles + crescendo + sharp_notes


def record(dry):
    """Band limit: only what lies below TOP_HZ passes."""
    return filtered(dry, lambda hz: hz < TOP_HZ)


dry = scene()
out = record(dry)
store_wav(out)
```